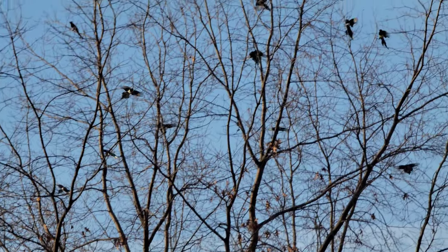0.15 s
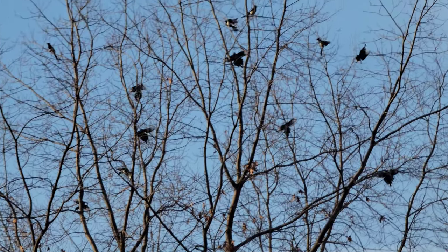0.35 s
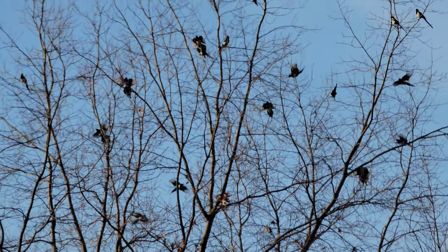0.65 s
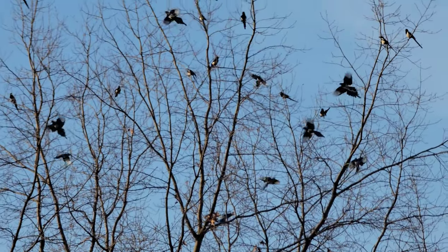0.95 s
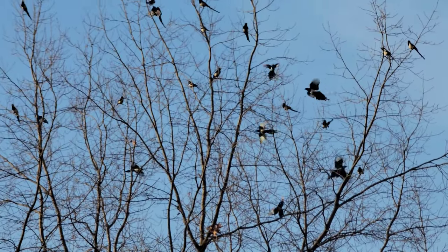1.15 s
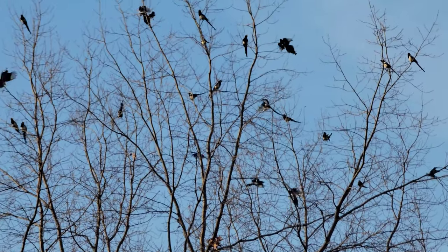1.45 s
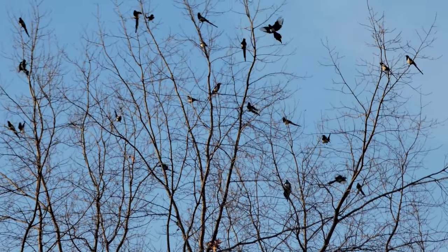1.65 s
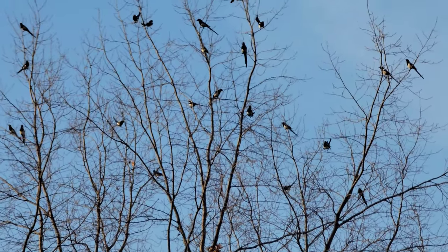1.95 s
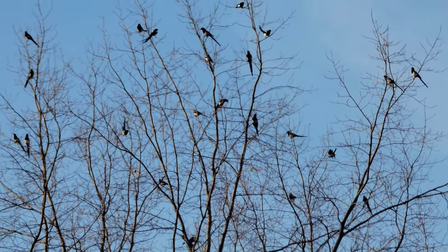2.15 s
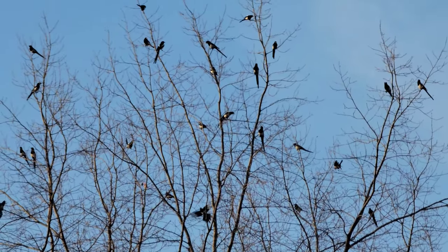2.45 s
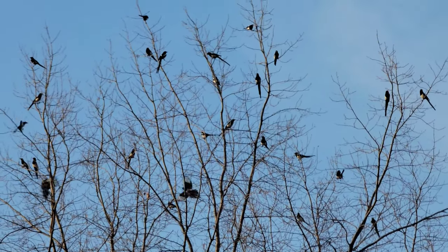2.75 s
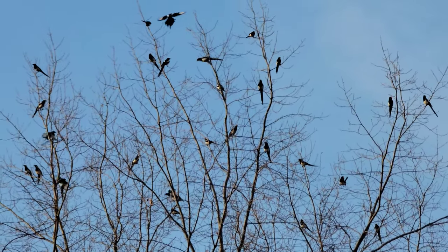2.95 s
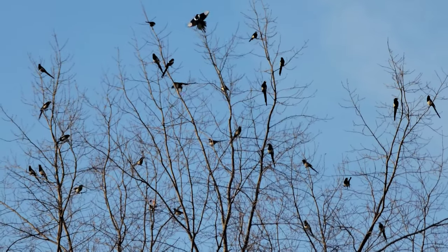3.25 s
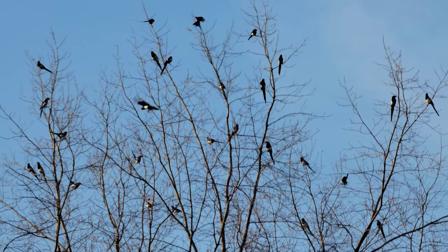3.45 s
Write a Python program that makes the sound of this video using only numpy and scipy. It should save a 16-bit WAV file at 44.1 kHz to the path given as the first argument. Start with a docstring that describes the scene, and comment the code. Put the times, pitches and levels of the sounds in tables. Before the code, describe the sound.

Dozens of rapid, hoarse magpie calls overlap, fuller and louder after a brief thinning near 1.3 seconds. Short tree echoes blur them; a distant animal yelps twice early, over soft rumble and hum, in an open-air stereo pickup.

```python
"""A flock of magpies chatters in tall bare trees, a little to the right, over a low rumble with a faint hum.
Each call is a noisy rasp sweeping up into a clearer cry, made of overtones shaped by throat resonances.
The trees scatter the sound back as fading noise. A far animal yelps twice in pure gliding tones,
a filtered noise burst makes one soft knock, and a small bird chips in short high whistles."""
import sys
import numpy as np
from scipy import signal
from scipy.fft import rfft, irfft
from scipy.io import wavfile
from scipy.ndimage import uniform_filter1d

SR = 44100
rng = np.random.default_rng(int(sys.argv[2]) if len(sys.argv) > 2 else 0)


def dump(signal):
    """Clip the signal to [-1, 1] and save it as 16-bit WAV at the path in sys.argv[1]."""
    limited = np.clip(np.atleast_2d(signal).T, -1, 1)
    pcm = np.round(limited * 32767).astype(np.int16)
    wavfile.write(sys.argv[1], SR, pcm)


N = 158760
T = np.arange(N) / SR  # time in s
SIDES = np.array([[.5], [-.5]])  # shares a left-minus-right difference between left and right
JITTER_HZ = 320  # speed of the birds' pitch unsteadiness


def from_db(db):
    """Turn decibels into a gain."""
    return 10 ** (np.asarray(db) / 20)


def rms_one(x):
    """Scale a sound to an average power of one."""
    return x / np.sqrt(np.mean(x ** 2) + 1e-20)


def at_hz(points, hz):
    """Read a curve between its points, with frequency on a logarithmic axis."""
    point_hz, value = np.transpose(points)
    return np.interp(np.log(hz + 1), np.log(point_hz), value)


def bins(x):
    """List the frequencies in a signal's spectrum."""
    return np.fft.rfftfreq(x.shape[-1], 1 / SR)


def colour(x, points):
    """Make frequencies louder or softer along a smooth curve in dB."""
    gain = from_db(at_hz(points, bins(x)))
    return irfft(rfft(x) * gain, x.shape[-1])


def wobble(rate_hz, size):
    """Slow down random noise into a smooth wander with a spread of one."""
    white = rng.standard_normal(size)
    slowed = rfft(white) / (1 + (bins(white) / rate_hz) ** 2)
    return rms_one(irfft(slowed, size))


def background():
    """Distant rumble, alike at both sides in the bass, thinning into wide faint hiss."""
    # Rumble spectrum: frequency [Hz], relative level per Hz [dB]
    rumble_colour = [(20, -21), (40, -13), (60, 1), (85, 2), (130, -8.5), (280, -14), (430, -18.5),
                     (650, -16.5), (950, -23.5), (1600, -23.5), (2900, -20.5), (4200, -25.5), (7000, -42.5),
                     (10000, -66), (13000, -49.5)]
    # How alike the two sides are: frequency [Hz], left-right correlation [-1 to 1]
    likeness = [(60, 0.95), (125, 0.93), (250, 0.86), (500, 0.51), (1000, 0.013), (8000, 0.34)]
    # Balance of the sides: frequency [Hz], left minus right [dB]
    air_balance = [(60, -1.5), (500, 1), (3000, 2), (8000, -4), (13000, -6.5)]
    level_db, swell_db, swell_hz = -45.5, 0.93, 6.6  # the level wavers gently
    mid, side = rfft(rng.standard_normal((2, N)))
    hz = bins(T)
    alike = np.clip(at_hz(likeness, hz), -1, 1)
    # Shared noise goes to both sides; the other noise enters with opposite signs
    pair = np.sqrt(1 + alike) * mid + np.sqrt(1 - alike) * side * 2 * SIDES
    tone_db = at_hz(rumble_colour, hz) + SIDES * at_hz(air_balance, hz)
    level = from_db(level_db + swell_db * wobble(swell_hz, size=N))
    return level * rms_one(irfft(pair * from_db(tone_db), N))


def hum():
    """A faint drone within the rumble: one steady pitch whose strength wavers."""
    pitch_hz, level_db, waver_hz = 176.1, -63, 1.8
    strength = from_db(level_db) * np.sqrt(2) * wobble(waver_hz, size=N)
    return strength * np.sin(2 * np.pi * pitch_hz * T)


def syrinx(pitch, jitter, overtones_db):
    """The bird's voice organ: a stack of overtones on an unsteady pitch, returned with its phase."""
    unsteady_hz = pitch * (1 + jitter * wobble(JITTER_HZ, size=len(pitch)))
    phase = 2 * np.pi * np.cumsum(unsteady_hz) / SR
    stack = 0
    for number, db in enumerate(overtones_db, 1):
        stack = stack + from_db(db) * np.sin(number * phase + rng.uniform(0, 2 * np.pi))
    return rms_one(stack), phase


def call(t, lead, top_hz, cry_db, rasp_db):
    """One rasp sweeping up into a cry, brightening as the beak opens; t is zero at the top of the sweep."""
    # Overtone strengths of the cry, lowest first: level [dB]
    cry_overtones = [-14, -9.5, 3.5, 7.5, -11, -2.5, 3.5, -20, -19]
    # Overtone strengths of the rasp, lowest first: level [dB]
    rasp_overtones = [-13.5, -9.5, 0, 2, -1.5, 2.5, 0, -3, -5]
    # Throat resonances: frequency [Hz], relative level [dB]
    throat = [(700, -17.5), (1400, -14.5), (2100, -10.5), (2550, -8), (2850, 0), (3100, 1), (3500, -4.5),
              (4300, -5.5), (4800, 0.5), (5250, 2.5), (5750, -4.5), (6800, -7.5), (9000, -30),
              (11000, -58.5), (14000, -44)]
    start_share, sweep_s, drop_per_s = .48, .078, 3.1  # start_share: lower limit of the pitch before the top
    cry_jitter, rasp_jitter = .016, .048  # pitch unsteadiness as a share
    rasp_noise = 0.74  # strength of the turbulence against the tone
    swell_s, peak_lead_s = 0.018, 0.014  # the cry is fully out just before the top
    glide_db = -8.5  # softer rising tone before the cry breaks out
    closed_db, opening_s, opening_hz = -8, 0.063, 4300  # treble held back by the beak
    attack_s, release_s = 0.045, 0.011
    flutter_db, flutter_hz, flock_db = 2, 140, -2.5  # flock_db shifts all calls alike

    before, after = np.minimum(t, 0), np.maximum(t, 0)
    # The pitch climbs ever faster to its top, then drops
    climb = start_share + (1 - start_share) * np.exp(before / sweep_s)
    pitch = top_hz * climb * np.exp(-drop_per_s * after)

    clear, _ = syrinx(pitch, cry_jitter, cry_overtones)
    hoarse, phase = syrinx(pitch, rasp_jitter, rasp_overtones)
    # Turbulence comes in puffs, one in each cycle of the pitch
    hoarse = hoarse + rasp_noise * (1 + np.cos(phase)) * rng.standard_normal(len(t))

    swell = np.exp(np.minimum(t + peak_lead_s, 0) / swell_s)
    cry = rms_one(colour(clear, throat)) * from_db(cry_db) * np.maximum(swell, from_db(glide_db))
    rasp = rms_one(colour(hoarse, throat)) * from_db(rasp_db)
    voice = cry + rasp

    dull = irfft(rfft(voice) / (1 + (bins(t) / opening_hz) ** 10))
    beak_db = closed_db * (1 - np.exp(-(before / opening_s) ** 2))
    voice = dull + (voice - dull) * from_db(beak_db)
    gate = np.clip((t + lead) / attack_s, 0, 1) * np.exp(-(after / release_s) ** 2)
    return voice * gate * from_db(flutter_db * wobble(flutter_hz, size=len(t)) + flock_db)


def magpies():
    """Calls differ in upper-resonance brightness and timing between sides; louder cries get more treble."""
    # Calls: top_s [s], lead_in_s [s], top_pitch_hz [Hz], then cry_db, rasp_db and
    # bright_db [dB], all three before the flock level and treble changes
    calls = [ (0.119, 0.11, 767.6, -51.5, -33, -9.5), (0.166, 0.13, 686, -50, -40, -0.5),
             (0.304, 0.09, 761, -32, -35.5, -9), (.355, 0.16, 736, -47.5, -40, 0),
             (0.501, 0.11, 744, -45.5, -37, -4), (0.534, 0.11, 725, -38.5, -36.5, -3),
             (0.663, 0.15, 717, -40, -41, -2.5), (.692, 0.11, 781, -39, -38, -14),
             (0.744, 0.091, 719, -48.5, -40.5, -4), (0.787, 0.071, 864, -47, -36, -11.5),
             (0.863, 0.11, 715, -39, -43.5, -10), (0.948, 0.099, 725.4, -39.5, -38, -7.5),
             (0.976, 0.06, 824, -43.5, -48, -5.5), (1.012, 0.12, 708, -42.5, -38.5, -14),
             (1.066, 0.078, 718, -39.5, -44.5, -13.5), (1.132, 0.12, 785, -48.5, -36, -16),
             (1.163, 0.11, 701, -44.5, -42.5, -3.5), (1.427, 0.15, 747, -39, -43, 6),
             (1.561, 0.096, 725, -36.5, -36.5, -1.5), (1.603, 0.1, 730, -35, -38, -1.5),
             (1.696, 0.089, 681, -35, -43, -2.5), (1.741, 0.096, 760, -38, -39.5, -1),
             (1.806, 0.11, 719, -42.5, -38, 5.5), (1.958, 0.082, 747, -35.5, -33.5, -6.5),
             (1.996, 0.074, 758, -39, -35.5, 6.5), (2.019, 0.043, 717, -39.5, -61, 6.5),
             (2.169, 0.11, 749, -41, -37.5, 3), (2.232, 0.069, 689, -38.5, -42, -20),
             (2.363, 0.1, 738, -35.5, -38.5, -1), (2.413, 0.089, 702.3, -35.5, -34, -4.5),
             (2.492, 0.11, 736, -40, -40, 0), (2.524, 0.049, 753, -34.5, -37.5, -16.5),
             (2.582, 0.11, 750.3, -29, -35, -0.5), (2.678, 0.088, 725, -41.5, -39.5, -4.5),
             (2.772, 0.099, 740, -33.5, -40.5, -11), (2.839, 0.13, 778.6, -37, -34.5, 0.5),
             (2.899, 0.048, 719, -37.5, -34.5, -8.5), (2.962, 0.089, 733, -38.5, -42.5, -2),
             (3.008, 0.11, 786, -36, -36.5, 0), (3.082, 0.057, 739, -41.5, -38, 3),
             (3.259, 0.12, 758, -43.5, -46, 9.5), (3.394, 0.093, 722, -34, -36, -4),
             (3.45, 0.068, 753, -36.5, -38, -1), (3.559, 0.087, 736.4, -36, -37, -0.5)]
    # Balance of the flock: frequency [Hz], left minus right [dB]
    flock_balance = [(1200, -1.5), (2100, -9.5), (5400, -10), (9000, 11), (13000, -10)]
    bright_hz, bright_width_hz = 5580, 1680  # upper resonance
    effort_hz, usual_cry_db, effort_gain = 6800, -40, 0.74  # treble dB for each dB above the usual cry
    left_lead_s, lead_spread_s = 0.00027, .00003  # the left side hears each call slightly earlier
    size, top = 8192, 7000  # samples in a call, and the sample at its top

    out = np.zeros((2, N + 2 * size))
    t = (np.arange(size) - top) / SR
    hz = bins(t)
    upper_resonance = 1 / (1 + ((hz - bright_hz) / bright_width_hz) ** 2)
    treble = 1 - 1 / (1 + (hz / effort_hz) ** 10)
    side_gain = from_db(SIDES * at_hz(flock_balance, hz))
    for top_s, lead, top_hz, cry_db, rasp_db, bright_db in calls:
        effort_db = effort_gain * (cry_db - usual_cry_db)
        tone_db = bright_db * upper_resonance + effort_db * treble
        spectrum = rfft(call(t, lead, top_hz, cry_db, rasp_db)) * from_db(tone_db)
        ahead_s = left_lead_s + lead_spread_s * rng.normal()
        time_shift = np.exp(2j * np.pi * hz * ahead_s * SIDES)
        start = int(top_s * SR)
        out[:, start:start + size] += irfft(spectrum * side_gain * time_shift)
    return out[:, top:top + N]


def trees(x):
    """Trunks and branches scatter sound into a fading blur of echoes, different at each side."""
    # Colour of the scatter: frequency [Hz], gain [dB]
    trees_colour = [(1000, 9), (2000, 4.5), (2900, -1), (4000, 2), (5200, -3.5), (9000, 6.5)]
    fade_60db_s = 0.29  # time to fade by 60 dB
    scatter = rng.standard_normal((2, SR)) * from_db(-60 * T[:SR] / fade_60db_s)
    scatter = scatter / np.sqrt(np.sum(scatter[0] ** 2))
    scatter = colour(scatter, trees_colour)
    return signal.fftconvolve(x[None], scatter, axes=1)[:, :N]


def yelps():
    """A far animal's two pure gliding tones: both rise, and the first falls back; trees echo them."""
    # One curve for each yelp: time_s [s], pitch_hz [Hz], level_db [dB, before the echo is added]
    yelp_curves = [
        [(.01, 630, -51), (.045, 721, -43), (.085, 852, -59.5), (.13, 805, -54.5), (.18, 714, -58.5)],
        [(1.228, 665, -49), (1.25, 663, -47), (1.316, 749, -43.5), (1.345, 751, -53.5), (1.375, 750, -58)],
    ]
    echo_db = -10
    out = 0
    for curve in yelp_curves:
        time_s, pitch_hz, level_db = np.transpose(curve)
        sounding = (T > time_s[0]) * (T < time_s[-1])
        level = from_db(np.interp(T, time_s, level_db)) * sounding
        level = uniform_filter1d(level, size=400)  # soften the edges
        phase = 2 * np.pi * np.cumsum(np.interp(T, time_s, pitch_hz)) / SR
        out = out + np.sqrt(2) * level * np.sin(phase)
    return out + from_db(echo_db) * trees(out)


def thump():
    """One soft, low knock: a burst of noise that dies away at once, with most of its treble removed."""
    # Colour of the knock: frequency [Hz], relative level [dB]
    thump_colour = [(60, -13), (220, -2), (400, -12), (560, -18.5), (1000, -39), (4000, -70)]
    start_s, peak_db, decay_s = .242, -33, 0.0069
    fade = (T > start_s) * np.exp(-abs(T - start_s) / decay_s)
    knock = colour(rng.standard_normal(N) * fade, thump_colour)
    return from_db(peak_db) * knock / abs(knock).max()


def small_bird():
    """Brief high whistled chips: wavering tones that swell and fade smoothly."""
    # Chips: middle_s [s], length_s [s], average pitch_hz [Hz], peak level_db [dB]
    chips = [(.605, 0.045, 6060, -47.5), (0.957, 0.046, 5800, -48), (2.926, 0.018, 6000, -41)]
    jitter = 0.056  # pitch unsteadiness as a share
    waver = 1 + jitter * wobble(JITTER_HZ, size=N)
    out = 0
    for middle_s, length_s, pitch_hz, level_db in chips:
        swell = np.exp(-(2 * (T - middle_s) / length_s) ** 2)
        whistle = np.sin(2 * np.pi * pitch_hz * np.cumsum(waver) / SR)
        out = out + from_db(level_db) * swell * whistle
    return out


def scene():
    """The birds and their echo from the trees, over the quiet surroundings."""
    trees_db, trees_balance_db = -7, -4  # the balance is left minus right
    birds = magpies() + small_bird()
    echo = from_db(trees_db + SIDES * trees_balance_db) * trees(birds[1])  # fed by the right side
    return birds + echo + yelps() + thump() + hum() + background()


def record(dry):
    """Cut off the highest treble steeply."""
    cutoff_hz = 15400
    return irfft(rfft(dry) / (1 + (bins(dry) / cutoff_hz) ** 200), N)


dry = scene()
out = record(dry)
dump(out)
```